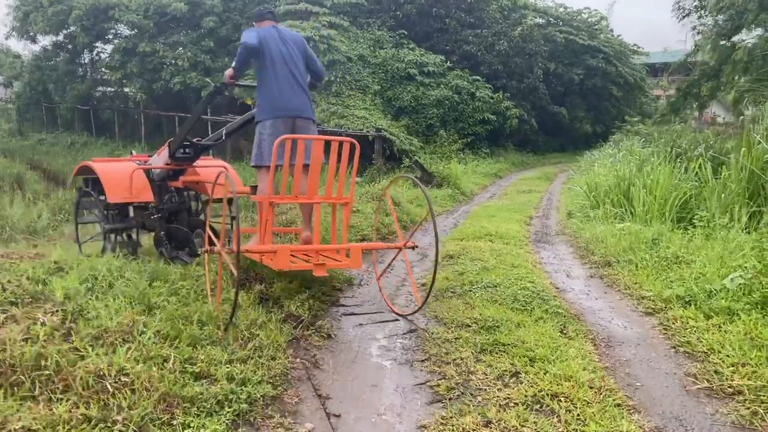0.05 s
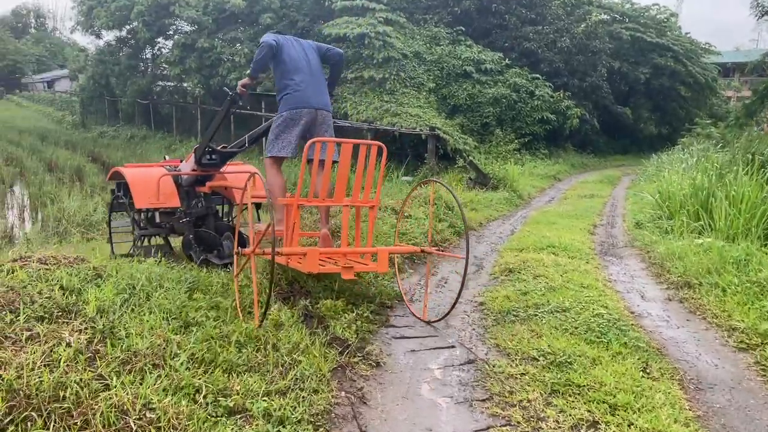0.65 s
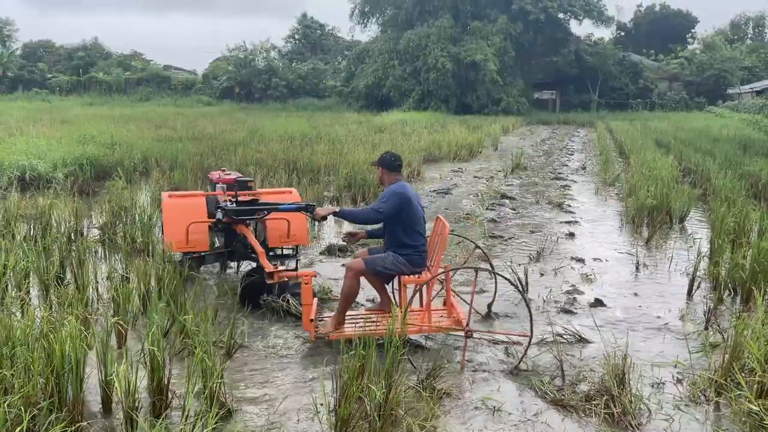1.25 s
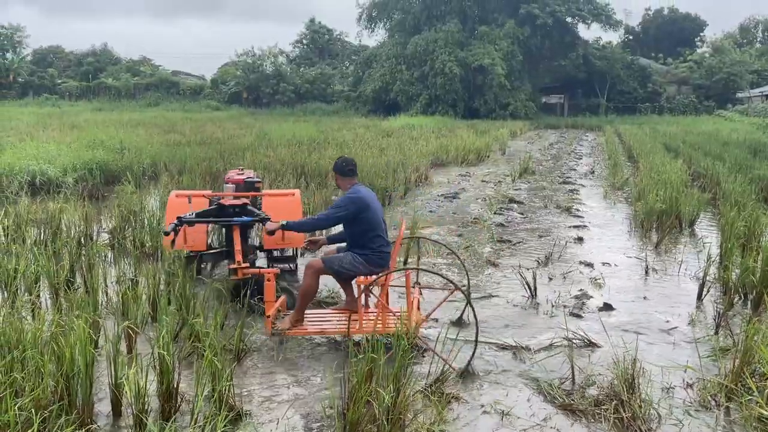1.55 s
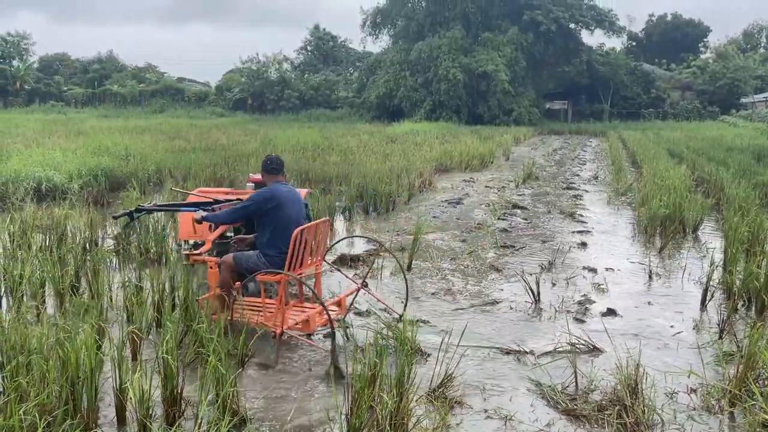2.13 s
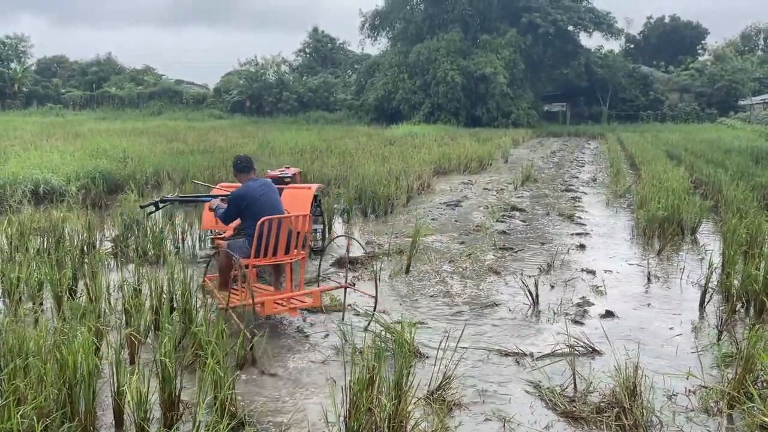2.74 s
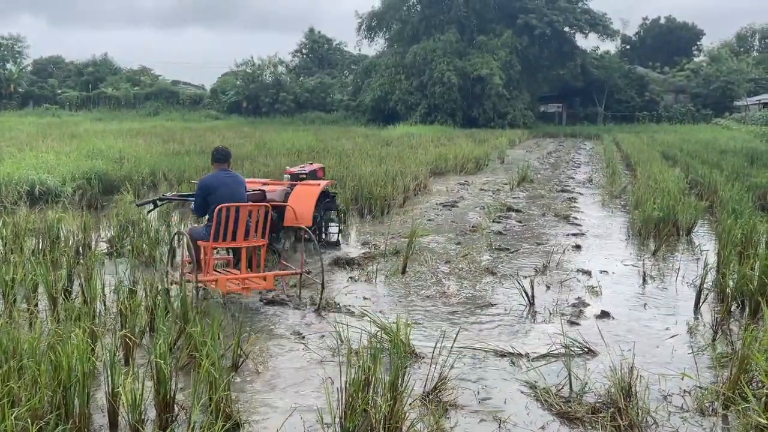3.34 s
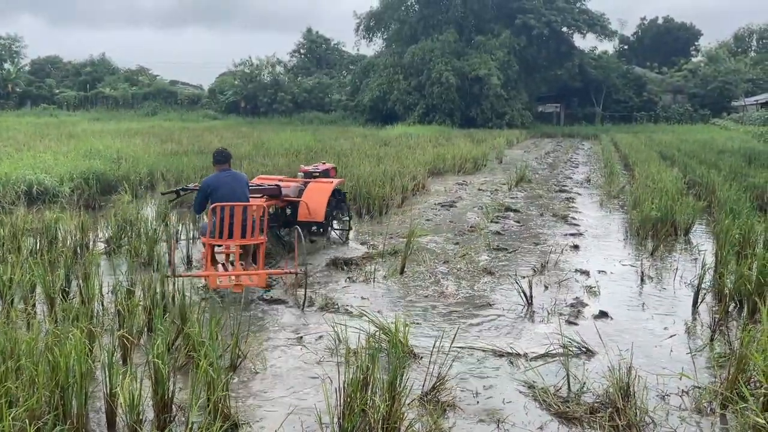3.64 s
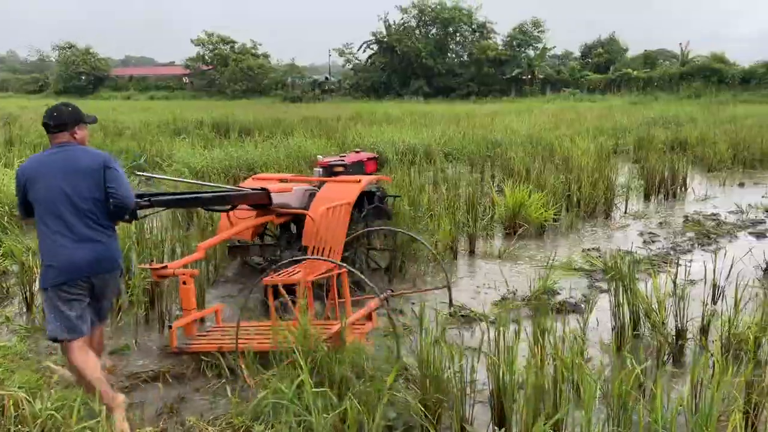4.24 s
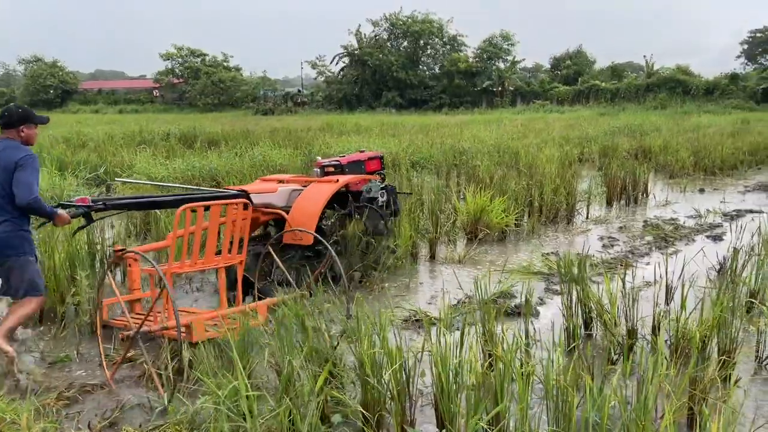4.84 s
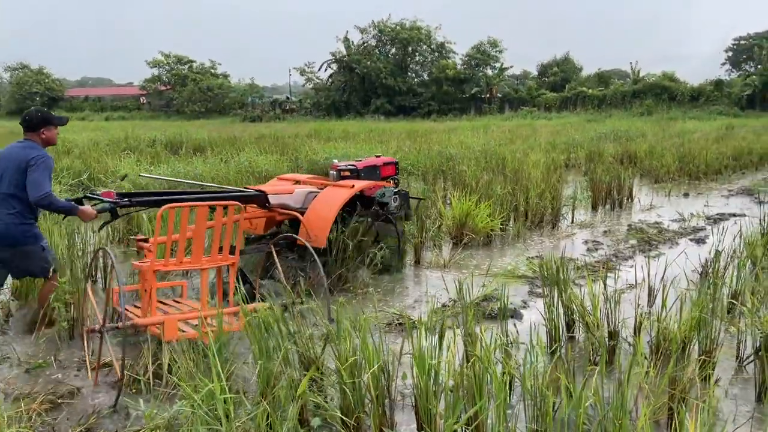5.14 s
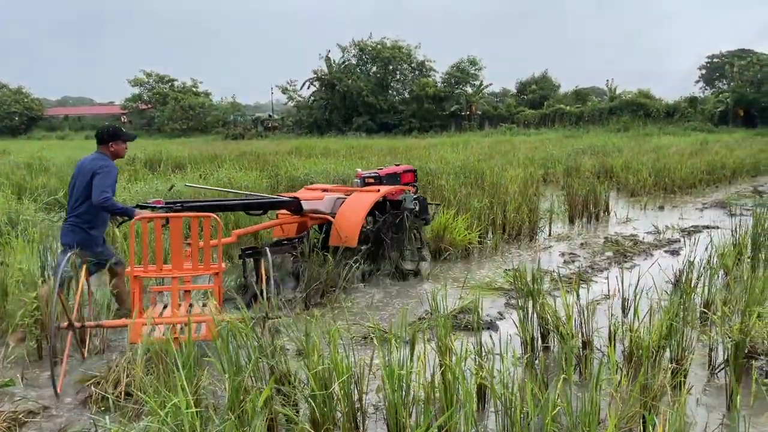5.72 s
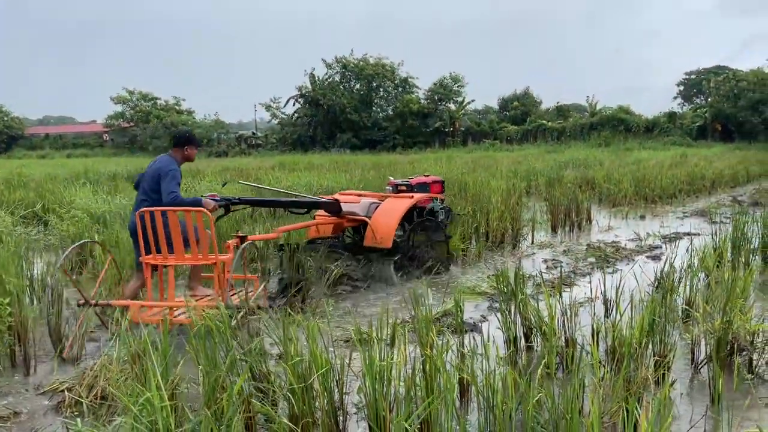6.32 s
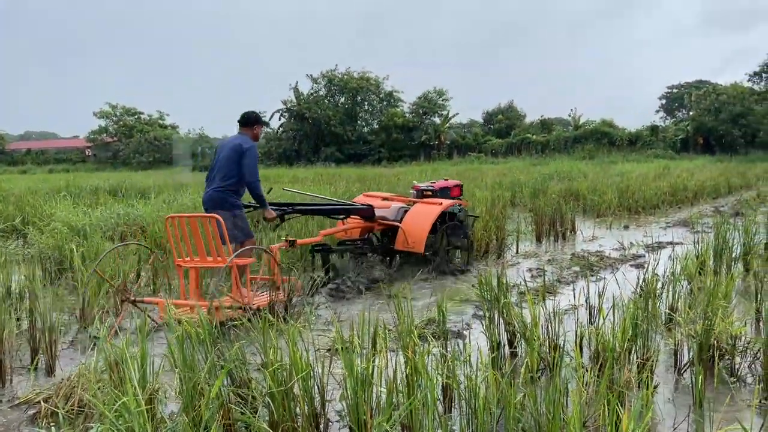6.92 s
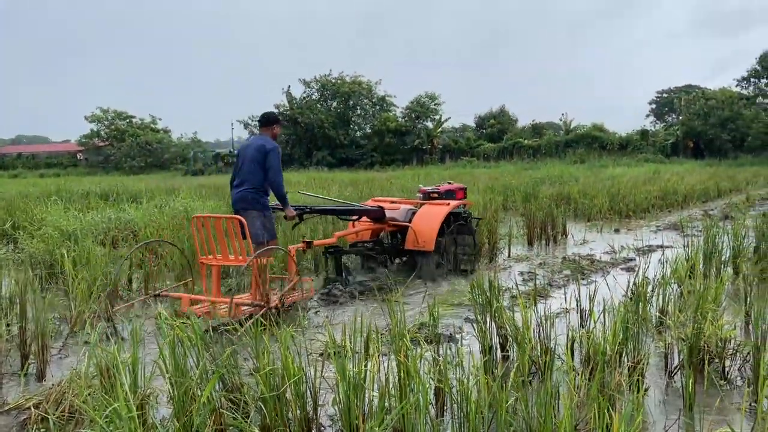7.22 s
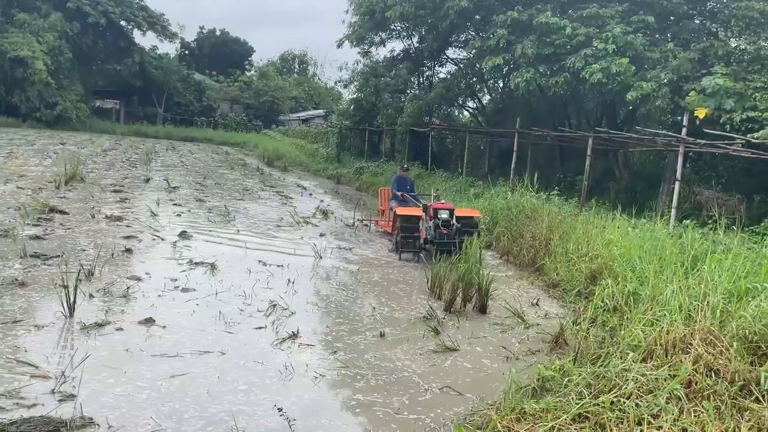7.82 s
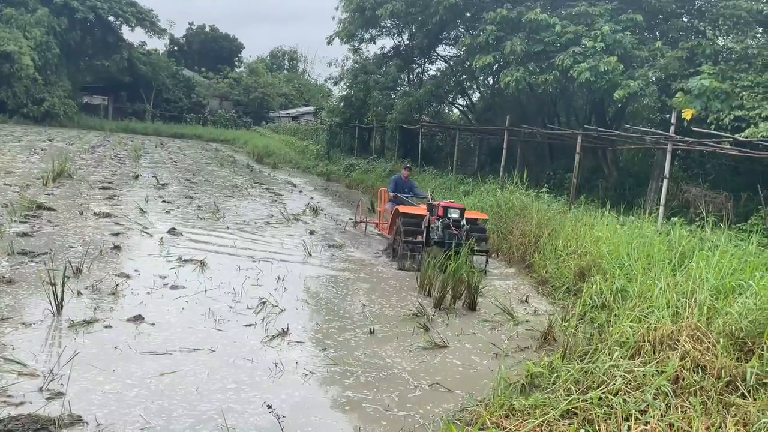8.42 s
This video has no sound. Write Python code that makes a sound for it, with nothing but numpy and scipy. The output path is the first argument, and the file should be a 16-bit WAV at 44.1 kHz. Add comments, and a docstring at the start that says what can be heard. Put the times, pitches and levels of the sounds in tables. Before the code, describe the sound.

The single-cylinder diesel engine of a walking tractor thumps and rattles steadily in a wet field, shifting suddenly in level and tone three times.

```python
"""A single-cylinder diesel hand tractor chugs at idle, then cuts to three stretches at working speed.
In every cycle exhaust and intake thump, the block knocks, the valve gear rattles, and the cylinder
and its cover clank on the same notes. The wet ground of a flooded rice field throws the clatter back.
The towed steel seat clinks, a bright burst of noise marks the first cut, panels judder under strain,
and a rough whine rises in the turn. A close pair of microphones hears it over a faint outdoor rumble."""
import sys
import numpy as np
from scipy import signal
from scipy.fft import rfft, irfft, next_fast_len
from scipy.io import wavfile

SR = 44100
rng = np.random.default_rng(int(sys.argv[2]) if len(sys.argv) > 2 else 0)


def store_pcm(level_fs):
    """Save levels as 16-bit WAV."""
    pcm = np.round(np.clip(level_fs, -1, 1) * 32767).astype(np.int16)
    wavfile.write(sys.argv[1], SR, np.atleast_2d(pcm).T)


N = 377937
FFT_SIZE = 2 * next_fast_len(N // 2 + 1, True)
T, HZ = np.arange(N) / SR, np.fft.rfftfreq(FFT_SIZE, 1 / SR) + 1e-3

# exhaust blast, its overtone, piston push, intake gulp, intake valve shutting: polarity, chamber_count
GAS_PULSES = [(-1, 1), (1, 1), (1, 2), (1, 2), (-1, 2)]
# The engine in each stretch. A place runs 0-1 through a cycle, from the exhaust valve opening.
#   start: start_s; cycles: time_s, cycles_done
#   gas, a row for each pulse: place, pitch_hz, width_hz, level_db; churn_db: turbulence against thump
#   levels: time_s, thump_db, pipe_ring_db, overtone_db, knock_db, rattle_db
#   blows: place, knock_db, rattle_db, decay_s
#   colour of the clatter: frequency_hz, gain_db; whirr_hz: the clatter is steady below this
#   clanks: peak_place, pitch_hz, over_knock_db, swell_s; drift: their pitch rise, as a share
#   view, how the clanks carry: time_s, cylinder_low_db, cylinder_high_db, cover_db
#   echo: first_delay_s, last_delay_s, first_gain, last_gain
#   lead: left_lead_s; width_db: the clatter's side over mid; pan (thump), clank_pan: left is positive
IDLING = dict( start=0, cycles=[(-.116, -1), (.518, 4), (.7684, 6), (1.267, 10)],
          gas=[(.002, 161.5, 17, 2.5), (.005, 190, 150, -29), (.288, 71, 26, -6), (.432, 102, 49, 0.5),
          (.701, 169, 73, -10.5)], blows=[(.97, 1, 8, .003), (.18, 8, 7, .004), (.28, 8, 5, .004),
          (.71, 4, 9, .003), (.8, 8, 3, .003)], levels=[(0, -25, 0.5, -3, -38, -41.5),
          (1.13, -23, 0, -7, -38, -44.5)], colour=[(330, -21), (440, -2), (520, -14.5), (620, -2),
          (780, -3.5), (1100, -8.5), (1380, -1), (1650, -12), (2450, -4.5), (3300, -11), (7000, -17.5),
          (14000, -26)], clanks=[(.205, 1940, 3.5, 0.0035), (.22, 3080, 3, 0.0036),
          (.23, 1380, 2.5, 0.0046), (.24, 1100, 2.5, .004), (.3, 634, 2, 0.021), (.75, 2540, 3, .005),
          (.83, 1370, 1.5, .005)], view=[(0, 0, 0, 0)],
          drift=0, whirr_hz=533, clank_pan=0.19, echo=(0.00197, 0.00201, 0.23, 0.29),
          lead=.00003, width_db=-5.5, pan=0.0, churn_db=-12)
TURNING = dict( start=1.137, cycles=[(1.087, -2), (1.6607, 8), (1.9499, 13), (2.1843, 17), (2.5333, 23),
           (3.2293, 35), (3.7552, 44), (4.1058, 50)], gas=[(-.003, 170.6, 14.6, 0.5),
           (-.033, 272.4, 26, -7.5), (.031, 54, 116, -11.5), (.376, 93.4, 43.7, -0.5),
           (.725, 182, 314, -8.5)], blows=[(.1, 1.5, 8.5, 0.0036), (.33, 0, 4, 0.0054), (.6, -4, 3, .004)],
           levels=[(1.14, -20.5, 0.56, -1.4, -29.5, -35.5), (3.3, -19, 1.1, 1.1, -31, -34.5),
           (4.07, -20, 1.3, 1.4, -30.5, -34.5)], colour=[(330, 0), (490, -10), (560, -5.5), (680, -5),
           (800, 0.5), (960, -3.5), (1250, -7.5), (1750, -6.5), (2050, -13.5), (2400, -8.5), (3200, -11.5),
           (4200, -18.5), (7000, -18.5), (14000, -23)], clanks=[(.07, 942, 2.5, 0.0074),
           (.15, 1690, -7, 0.0032), (.18, 2486, -7.5, 0.0053), (.2, 1035, 8.5, 0.0049),
           (.38, 943, 4, 0.0075), (.41, 1720, -6.5, 0.0051), (.68, 620, 0, .009), (.77, 1026, 2, 0.006),
           (.93, 928, 7, 0.0055), (.17, 4390, -10, 0.0043)], view=[(1.14, -6, -5, -4), (2.05, .5, -1, 0),
           (3.2, -.5, 4, 2), (4.07, -.5, 4, 2)],
           drift=.1, whirr_hz=750, clank_pan=0.23, echo=(0.001486, 0.001454, -0.11, -0.3),
           lead=.00008, width_db=-9, pan=.01, churn_db=-14.5)
PASSING = dict( start=4.075, cycles=[(4.07, -1), (4.9386, 12), (5.1422, 15), (5.4859, 20), (6.1694, 30),
           (6.5824, 36), (6.7225, 38), (7.1444, 44), (7.6307, 51)], gas=[(-.013, 162.4, 27, 0.5),
           (.022, 320, 104, -16), (.35, 61.4, 41, -1), (.5, 65, 47, 0), (.725, 193.5, 235, -9.5)],
           blows=[(.125, 5, 7.5, 0.0049), (.33, 7, 6.5, 0.0047), (.64, 1, 0.5, .006)],
           levels=[(4.08, -18.5, 4.4, 0.6, -26, -32), (6.1, -19, 0.88, 5.4, -31.5, -33),
           (7.57, -19.5, 1.5, 6.8, -31.5, -35.5)], colour=[(330, 8), (470, -4.5), (600, -1), (750, 0.5),
           (920, 0), (1480, -1), (1720, -11.5), (1950, -10.5), (2300, -12), (2900, -11.5), (3800, -17),
           (7000, -21), (10000, -22), (14000, -28)], clanks=[(.185, 916, 12, 0.0037),
           (.19, 2460, -3.5, 0.0045), (.195, 2875, 2, 0.0059), (.22, 1230, 5.5, 0.0023),
           (.245, 1476, 4, 0.0048), (.16, 1950, -1.5, .002), (.34, 602, 3, 0.0072), (.37, 1130, 3.5, .005),
           (.7, 614, -2, 0.01), (.99, 574, -1, 0.012)], view=[(4.08, -3, -4, -9), (4.55, 1.5, -5, -1),
           (5.3, 1, -4.5, 0), (6.1, .5, 0, -.5), (6.7, -2.5, 6, -2.5), (7.57, -6, 3.5, -6)],
           drift=.05, whirr_hz=760, clank_pan=0.27, echo=(0.00122, 0.00077, 0.072, 0.14),
           lead=.00002, width_db=-6.5, pan=-0.078, churn_db=-15.5)
APPROACHING = dict( start=7.577, cycles=[(7.5501, -2), (7.7152, 1), (8.2169, 10), (8.6033, 17)],
               gas=[(.014, 167, 22, 0), (-.028, 232, 35, -8.4), (.07, 60, 208, -11.3), (.399, 102, 52, 2.4),
               (.685, 261, 164, -7.4)], blows=[(.08, 4.5, 6, .004), (.29, 1, -1, .005), (.62, -2, -1, .004),
               (.88, 0, -2, .004)], levels=[(7.58, -16.7, 0, 0, -24, -27.7),
               (8.57, -16.1, 0, 0, -23.3, -27.4)], colour=[(330, -1), (450, 0), (550, -5.5), (640, -2),
               (850, -2), (1270, 1), (1700, -3), (2200, -8), (2900, -9), (3600, -14), (7000, -21),
               (10000, -23), (14000, -28)], clanks=[(.125, 2960, 3, .003), (.14, 1570, 2, .004),
               (.175, 1230, 8, .005), (.19, 900, 1, .005), (.21, 2550, -3, .005), (.7, 1700, -4, .006),
               (.98, 1330, 2, .005)], view=[(7.58, -1, -1, -.5)],
               drift=0, whirr_hz=750, clank_pan=-.1, echo=(.0011, .0011, .1, .1),
               lead=.00002, width_db=-13, pan=-.12, churn_db=-17)
# driver and seat screen the engine: centre_s, half_length_s, overtone_db, knock_db, rattle_db
SCREENINGS = [(2.5, 0.6, -5.5, -0.55, -2.5), (4.5, 0.32, -6.5, -1.4, -.5)]
# ring of the block and covers: pitch_hz, width_hz, over_clatter_db
BLOCK_MODES = [(439, 14, -3.5), (585, 57, 2), (873, 24, -7.5), (975, 41, -9), (1280, 27, -7.5),
               (2483, 123, -10.5), (2890, 61, -15), (4920, 110, -12), (5960, 130, -15)]
# where the clanking parts ring: block_hz, cylinder_low_hz, cylinder_high_hz, cover_hz
PARTS_HZ = [650, 930, 1500, 2450]
# clinks of the seat and linkage and, at 1.138 s, a brief noise burst at the cut into the second stretch:
# start_s, level_db, decay_s, snap_db
BRIGHT_BURSTS = [(.254, -31.5, 0.0059, -42), (0.318, -27.5, 0.018, -32), (.382, -32, 0.0094, -45),
                 (.518, -32, .005, -48), (.718, -33, 0.0046, -50), (0.771, -32, 0.019, -50),
                 (.954, -34, 0.0071, -45), (1.063, -45, .004, -34), (1.138, -32, 0.044, -42),
                 (4.423, -24.5, 0.025, -27), (4.465, -27, 0.034, -28), (5.885, -31, 0.012, -33)]
# their steely ring: pitch_hz, width_hz, gain_db
STEEL_MODES = [(3260, 450, 12.4), (4070, 910, 12.2), (5840, 380, 13.4), (7450, 510, 7.1)]
# seat bars ringing on: start_s, pitch_hz, level_db, decay_s
BAR_RINGS = [(.319, 5243, -31, .012), (.321, 5582, -31, .016), (.32, 6304, -32, .014),
             (4.426, 4200, -36, .025), (4.466, 4200, -33, .03)]
# shakes of the frame and mudguards: start_s, length_s, level_db, attack_s
JUDDERS = [(1.378, 0.027, -18, 0.0013), (4.146, 0.21, -20, 0.019)]
# ring of their sheet metal: pitch_hz, width_hz, gain_db
PANEL_MODES = [(424, 36, 6.5), (630, 90, -2), (827, 45, 8), (945, 24, 9.5), (1113, 28, -1.5),
               (1330, 110, -16)]
# colour of the whine: pitch_hz, width_hz, gain_db
WHINE_BANDS = [(1690, 300, 3), (2420, 200, -3), (3670, 370, -5), (4400, 170, -2)]
# swell of the whine: time_s, level_db
WHINE_LEVEL = [(2.6, -62), (3.15, -39), (4.07, -42)]
# the microphone pair's EQ for mid and for side: frequency_hz, gain_db
MID_EQ = [(6800, 0.5), (7500, -5.5), (7850, -31), (8250, -30), (8800, -6), (9800, -1.5), (12000, -3.5),
          (13600, -7.5), (14200, -28), (16000, -33)]
SIDE_EQ = [(300, -4), (900, 2.5), (4500, 3.5), (6300, 2.5), (7800, 6.5), (9200, 8.5), (10500, -2),
           (11600, -18), (12800, -2), (15000, 6.5)]


def amp(db):
    """Decibels to gain."""
    return 10 ** (np.asarray(db) / 20)


def unit(x):
    """Scales to rms 1."""
    return x / np.sqrt(np.mean(x ** 2) + 1e-20)


def eq_curve(points, f=HZ):
    """Gain at every frequency from points of frequency_hz, gain_db."""
    hz, db = np.transpose(points)
    return amp(np.interp(np.log(f), np.log(hz), db))


def filtered(x, gain):
    """Applies a frequency response."""
    return irfft(rfft(x, FFT_SIZE) * gain, FFT_SIZE)[:N]


def resonance(f, hz, width):
    """Response of one damped resonance, 1 at its peak."""
    return 1 / (1 + 1j * (f * f - hz * hz) / (f * width))


def ringing(modes, f=HZ):
    """Response of a body with several resonances."""
    return sum(amp(db) * resonance(f, hz, width) for hz, width, db in modes)


def grit(size=N, spread_db=2.0):
    """Dense tiny impacts of uneven size."""
    return unit(rng.standard_normal(size) * amp(spread_db * np.minimum(rng.exponential(1, size), 5)))


def shaken(response, side_db):
    """Grit through a body's response, mid and side."""
    mid, side = (unit(filtered(grit(), response)) for _ in range(2))
    return np.array([mid, amp(side_db) * side])


def thump(stretch, cycles, rate, ring_db, overtone_db, uneven=0.0081, low_hz=43, high_hz=370):
    """Five gas pulses a cycle ring the pipes, building a bass on harmonics of the firing rate."""
    harmonic = np.arange(1, 50)
    f = harmonic * rate
    pulses = sum(sign * amp(db) * resonance(f, hz, width) ** chambers
                 * np.exp(-2j * np.pi * harmonic * place)
                 for (sign, chambers), (place, hz, width, db) in zip(GAS_PULSES, stretch["gas"]))
    pulses /= (1 + 1.19 * low_hz / (1j * f) - (low_hz / f) ** 2) ** 2  # small mouths lose deep bass
    pulses /= 1 + (f / high_hz) ** 8  # the silencer holds back the top
    place = np.linspace(0, 1, 1024)
    partials = (pulses[:, None] * np.exp(2j * np.pi * harmonic[:, None] * place)).real
    # as the pipe swings round, its ring and overtones swell or fade against the rest
    ring = np.interp(f, [135, 158, 178, 205], [0, 1, 1, 0])
    overtones = np.interp(f, [230, 330], [0, 1])
    bands = [(1 - ring - overtones, 0), (ring, ring_db), (overtones, overtone_db)]
    wave = sum(amp(db) * np.interp(cycles % 1, place, share @ partials) for share, db in bands)
    force = 1 + uneven * rng.standard_normal(256)  # no two strokes are equally strong
    return unit(wave * np.interp(2 * cycles + 8, np.arange(256), force))


def exhaust_churn():
    """Low turbulence at the pipe mouth, mid and side."""
    colour = eq_curve([(20, -32), (35, -8), (55, 0), (165, 0), (230, 0.5),
                       (320, -8.5), (450, -18), (900, -45)])
    return shaken(colour, side_db=0)


def hammering(stretch, cycles, rate, rise_s=0.0036, uneven_db=2.5):
    """Knock and rattle envelopes: each blow jumps above the steady whirr of the gears and dies away."""
    power = np.ones((2, len(cycles)))
    for place, knock_db, rattle_db, decay_s in stretch["blows"]:
        number, phase = np.divmod(cycles - place, 1)
        age = phase / rate
        force = amp(uneven_db * rng.standard_normal(128))[number.astype(int)]
        blow = 2 * force * (1 - np.exp(-age / rise_s)) * np.exp(-age / (2 * decay_s))
        power += (amp([[knock_db], [rattle_db]]) * blow) ** 2 / 2
    return np.sqrt(power / power.mean(1, keepdims=True))


def chassis_ripple(f, count=8, strength=0.12):
    """Short reflections between the steel parts ripple the treble."""
    delay_s = rng.uniform(.002, .016, (count, 1))
    return 1 + strength * np.exp(-2j * np.pi * delay_s * f).sum(0) * f ** 2 / (f ** 2 + 1500 ** 2)


def clatter(stretch, cycles, rate, knock_db, rattle_db, knock_repeat=0.73, rattle_repeat=0.1):
    """Blows shake the block: a low knock and a bright rattle, partly alike each cycle; mid and side."""
    n = len(cycles)
    size = next_fast_len(n + 4096)
    f = np.fft.rfftfreq(size, 1 / SR) + 1e-3
    body = eq_curve(stretch["colour"], f) * (1 + ringing(BLOCK_MODES, f)) * chassis_ripple(f)
    body /= np.sqrt(1 + (300 / f) ** 8)  # low cut
    low = 1 / (1 + (f / 1800) ** 8)  # crossover from knock to rattle
    bands = [(low, knock_db, knock_repeat, 500, 1800), (1 - low, rattle_db, rattle_repeat, 1800, 7500)]
    cycle_sample = (cycles % 1 / rate * SR).astype(int)
    steady = 1 / (1 + (f / stretch["whirr_hz"]) ** 12)
    whirr = rfft(grit((2, n)), size) * np.sqrt(steady)
    left_lead = 1j * np.sin(np.pi * f * stretch["lead"]) / np.hypot(1, f / 3400)
    out = np.zeros((2, n))
    for force, (share, db, repeat, low_hz, high_hz) in zip(hammering(stretch, cycles, rate), bands):
        repeat = repeat * (1 - (force.min() / force) ** 2)  # the whirr between blows never repeats
        fresh, alike = grit((2, 2, n))
        drive = force * (np.sqrt(repeat) * alike[:, cycle_sample] + np.sqrt(1 - repeat) * fresh)
        colour = body * np.sqrt(share)
        colour /= np.sqrt(np.mean(abs(colour) ** 2 * (f > low_hz) * (f < high_hz)))
        direct, scattered = (rfft(drive, size) * np.sqrt(1 - steady) + whirr) * colour
        side = amp(stretch["width_db"]) * scattered + left_lead * direct
        out += amp(db) * irfft(np.array([direct, side]), size)[:, :n]
    return out


def ground_echo(x, stretch):
    """Wet ground returns the clatter a moment later; delay and strength shift as the tractor moves."""
    first_s, last_s, first_gain, last_gain = stretch["echo"]
    n = np.arange(x.shape[1])
    gain = np.linspace(first_gain, last_gain, len(n))
    delay = SR * np.linspace(first_s, last_s, len(n))
    echo = np.array([np.interp(n - delay, n, channel) for channel in x])
    return (x + gain * echo) / np.sqrt(1 + gain ** 2)


def clanks(stretch, t, cycles, rate, jitter_s=0.00007, uneven_db=1.5, detune=.02, steepness=3.5):
    """Blows ring the same parts every cycle: each clean note swells and is quickly damped."""
    when, *view = np.transpose(stretch["view"])
    strength, late = rng.standard_normal((2, 128))  # shared by the clanks of a cycle
    glide = stretch["drift"] * np.linspace(-.5, .5, len(t))
    mid = np.zeros(len(t))
    for place, hz, db, swell_s in stretch["clanks"]:
        number, phase = np.divmod(cycles - place + swell_s * rate, 1)
        number, age = number.astype(int), phase / rate
        # the block carries alike all round; cylinder and cover change as the tractor turns
        carry_db = [np.interp(hz, PARTS_HZ, [0, *row]) for row in np.transpose(view)]
        force_db = (.9 * strength + uneven_db * rng.standard_normal(128))[number]
        note_hz = hz * (1 + glide + detune * rng.standard_normal(128)[number])
        swell = (age / swell_s * np.exp(1 - age / swell_s)) ** steepness
        note = np.sin(2 * np.pi * note_hz * (age - swell_s - jitter_s * late[number]))
        mid += amp(db + np.interp(t, when, carry_db) + force_db) * swell * note
    side = stretch["clank_pan"] * mid + stretch["lead"] * SR / 2 * np.gradient(mid)
    return np.array([mid, side])


def engine_faders(stretch, t):
    """Levels ride as the tractor moves; overtones, knock and rattle duck behind driver and seat."""
    when, *levels = np.transpose(stretch["levels"])
    thump_db, ring_db, overtone_db, knock_db, rattle_db = (np.interp(t, when, db) for db in levels)
    for centre_s, half_length_s, overtone_dip_db, knock_dip_db, rattle_dip_db in SCREENINGS:
        hidden = np.exp(-((t - centre_s) / half_length_s) ** 4)
        overtone_db += overtone_dip_db * hidden
        knock_db += knock_dip_db * hidden
        rattle_db += rattle_dip_db * hidden
    return thump_db, ring_db, overtone_db, knock_db, rattle_db


def engine(stretch, t, churn, puff_s=0.001, churn_side_db=-3):
    """One stretch of the diesel, metal and gas locked to the firing cycle; mid and side."""
    when, done = np.transpose(stretch["cycles"])
    cycles = np.interp(t, when, done)
    rate = (done[-1] - done[0]) / (when[-1] - when[0])  # mean firings a second
    thump_db, ring_db, overtone_db, knock_db, rattle_db = engine_faders(stretch, t)
    metal = ground_echo(clatter(stretch, cycles, rate, knock_db, rattle_db), stretch)
    metal += amp(knock_db) * clanks(stretch, t, cycles, rate)
    puff = unit(.5 + np.exp(-(cycles % 1) / rate / puff_s))  # turbulence follows each exhaust pulse
    gas_mid, gas_side = amp(stretch["churn_db"]) * puff * churn
    bass_mid = thump(stretch, cycles, rate, ring_db, overtone_db) + gas_mid
    bass_side = stretch["pan"] * bass_mid + amp(churn_side_db) * gas_side
    return metal + amp(thump_db) * np.array([bass_mid, bass_side])


def air_rumble(level_db=-43, side_db=-16):
    """A faint, deep bed of outdoor air lies under everything."""
    colour = eq_curve([(20, -26), (38, -3), (52, 4), (75, -5), (150, -42), (400, -36), (2000, -80)])
    mid, side = (unit(filtered(rng.standard_normal(N), colour)) for _ in range(2))
    return amp(level_db) * np.array([mid, amp(side_db) * side])


def bright_bursts(side_db=-3, rise_s=0.00036, snap_s=0.0061, snap_hz=8500):
    """A treble snap with a short steely tail: the seat's clinks, and the noise burst at the first cut."""
    tail, snap = np.zeros((2, N))
    for start_s, db, decay_s, snap_db in BRIGHT_BURSTS:
        age = np.maximum(T - start_s, 0)
        rise = 1 - np.exp(-age / rise_s)
        tail += amp(db) * rise * np.exp(-age / decay_s)
        snap += amp(snap_db) * rise * np.exp(-age / snap_s)
    steely = ringing(STEEL_MODES) * HZ ** 2 / (HZ ** 2 + 2500 ** 2)
    treble = 1 / (1 + (snap_hz / HZ) ** 4)
    return tail * shaken(steely, side_db) + snap * shaken(treble, side_db)


def seat_bars():
    """Knocked bars of the seat ring briefly, each on one note, left of centre."""
    mid = np.zeros(N)
    for start_s, hz, db, decay_s in BAR_RINGS:
        age = np.maximum(T - start_s, 0)
        mid += amp(db) * np.exp(-age / decay_s) * np.sin(2 * np.pi * hz * age)
    return np.array([mid, .5 * mid])


def panel_judders(side_db=-7, release_s=0.032):
    """The frame and sheet mudguards shake for a moment under strain."""
    force = np.zeros(N)
    for start_s, length_s, db, attack_s in JUDDERS:
        ramps = np.minimum((T - start_s) / attack_s, (start_s + length_s - T) / release_s)
        force += amp(db) * np.clip(ramps, 0, 1)
    return force * shaken(ringing(PANEL_MODES) / (1 + (HZ / 1700) ** 4), side_db)


def turning_whine(side_db=-4):
    """A rough metallic whine swells as the tractor turns away, and stops at the cut."""
    when, db = np.transpose(WHINE_LEVEL)
    bands = sum(amp(gain_db) * resonance(HZ, hz, width) ** 2 for hz, width, gain_db in WHINE_BANDS)
    gate = (T > when[0]) * (T < PASSING["start"])
    return amp(np.interp(T, when, db)) * gate * shaken(bands, side_db)


def scene():
    """Four engine stretches cut end to end under the other layers; mid and side become left and right."""
    stretches = [IDLING, TURNING, PASSING, APPROACHING]
    churn = exhaust_churn()
    cuts = [round(stretch["start"] * SR) for stretch in stretches] + [N]
    tractor = np.hstack([engine(stretch, T[a:b], churn[:, a:b])
                         for stretch, a, b in zip(stretches, cuts, cuts[1:])])
    mid, side = tractor + bright_bursts() + seat_bars() + panel_judders() + turning_whine() + air_rumble()
    return np.array([mid + side, mid - side])


def record(dry, high_cut_hz=15800):
    """The microphone pair notches the treble in mid and side; a steep high cut follows."""
    mid = filtered((dry[0] + dry[1]) / 2, eq_curve(MID_EQ))
    side = filtered((dry[0] - dry[1]) / 2, eq_curve(SIDE_EQ))
    high_cut = signal.firwin(511, high_cut_hz, window=("kaiser", 9), fs=SR)
    return signal.oaconvolve(np.array([mid + side, mid - side]), high_cut[None], "same")


dry = scene()
out = record(dry)
store_pcm(out)
```